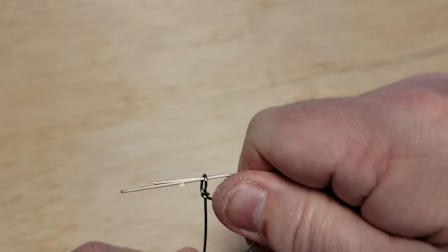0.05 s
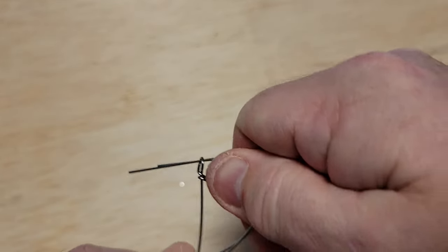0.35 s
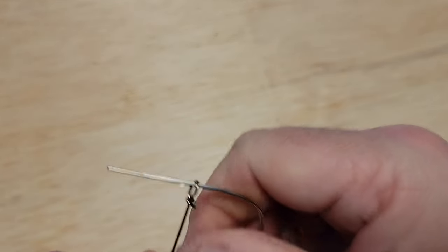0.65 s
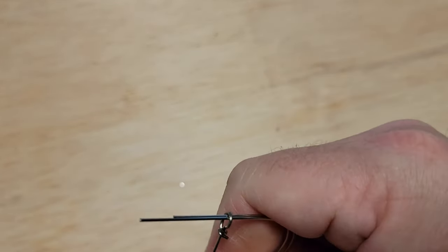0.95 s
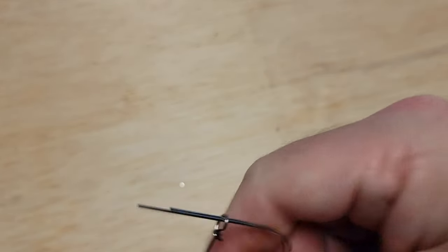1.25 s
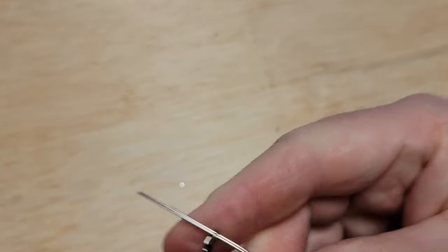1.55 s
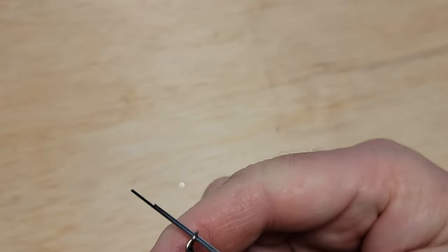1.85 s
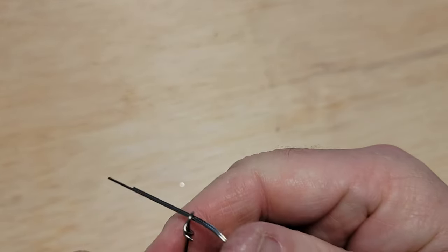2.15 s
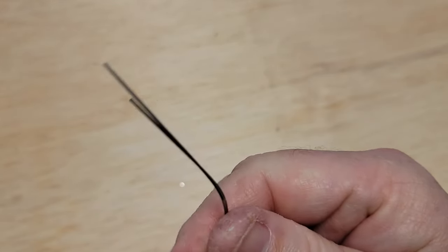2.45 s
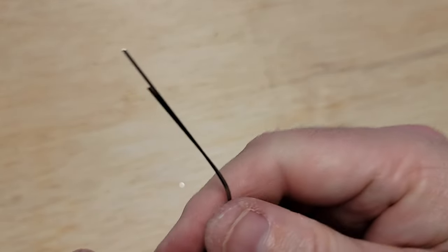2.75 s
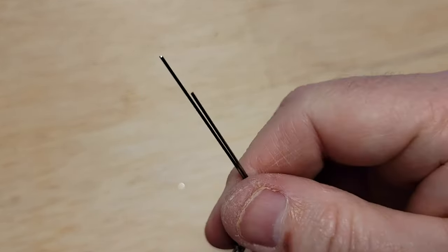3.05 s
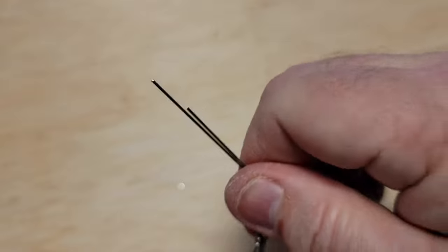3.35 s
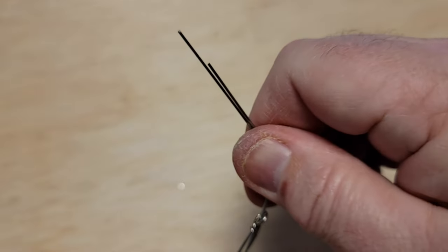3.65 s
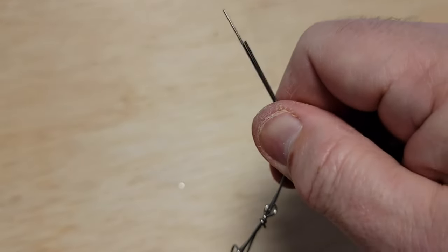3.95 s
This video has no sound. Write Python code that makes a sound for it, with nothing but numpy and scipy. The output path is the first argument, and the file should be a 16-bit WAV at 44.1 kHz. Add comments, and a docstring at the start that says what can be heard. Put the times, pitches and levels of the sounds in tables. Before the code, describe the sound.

One sharp snap of thin wire follows light ticks and the soft hiss of fingertips sliding along it, close up in a small room. The fan hum behind dips after the snap, and a small knock comes last.

```python
"""A faint metallic ring fades over the hum of a fan in a small room.
Close to the microphone, fingers bend thin wire: it ticks, knocks and rubs against skin,
then gives with one sharp snap that the walls throw back.
The recorder's gain control ducks the room after the snap and slowly lets it return."""
import sys
import numpy as np
from scipy import signal
from scipy.fft import rfft, irfft
from scipy.io import wavfile
from scipy.ndimage import uniform_filter1d, minimum_filter1d

SR = 44100
rng = np.random.default_rng(int(sys.argv[2]) if len(sys.argv) > 2 else 0)


def persist_wave(psi):
    """Save psi, clipped to +-1, as 16-bit WAV."""
    counts = np.round(np.clip(psi, -1, 1) * 32767).astype(np.int16)
    wavfile.write(sys.argv[1], SR, np.atleast_2d(counts).T)


N = 4 * SR


def amp(db):
    """Decibels to gain."""
    return 10 ** (np.asarray(db) / 20)


def unit(x):
    """Scales to rms 1."""
    return x / np.sqrt(np.mean(x ** 2) + 1e-20)


def read(points, hz):
    """Reads a table on a log-frequency axis."""
    f, value = np.transpose(points)
    return np.interp(np.log(hz + 1), np.log(f + 1), value)


def add(mix, start_s, sound):
    """Adds a sound at its time."""
    part = mix[max(round(start_s * SR), 0):][:len(sound)]
    part += sound[:len(part)]


def fade(t, t60):
    """Exponential decay, 60 dB down at t60."""
    return np.exp(-np.log(1000) * t / t60)


def noise(colour, size):
    """Noise of rms 1, shaped by a gain per frequency."""
    white = rfft(rng.standard_normal(size))
    return unit(irfft(white * colour(np.fft.rfftfreq(size, 1 / SR)), size))


def burst(colour, t60, size=2048):
    """A dying burst of noise, coloured by a minimum-phase filter so its attack stays sharp."""
    t = np.arange(size) / SR
    envelope = fade(t, t60)
    flat_spectrum = np.exp(1j * np.angle(np.fft.fft(rng.standard_normal(size) * envelope)))
    hz = abs(np.fft.fftfreq(size, 1 / SR))
    log_gain = np.log(np.maximum(unit(colour(hz)), 1e-4))
    response = np.exp(np.conj(signal.hilbert(log_gain)))
    taper = np.cos(np.pi / 2 * t / t[-1]) ** 2
    sound = np.fft.ifft(flat_spectrum * response).real * taper
    return sound * np.linalg.norm(envelope) / np.linalg.norm(sound)


# bands of the opening ring: f/Hz, width/Hz, level/dB, t60/s
RING_BANDS = [(303, 55, -38, 2.1), (830, 440, -39, 1.85), (1095, 46, -39.5, 0.67), (1610, 98, -43.5, 0.69),
              (2280, 690, -51.5, 1), (4550, 1400, -52, 2.7), (6700, 680, -53, 2.1), (9900, 4200, -49, 2.9),
              (14600, 900, -57, 1.5)]
def faint_ring():
    """A fuzzy metallic ring hangs in the room as bands of noise dying away."""
    out, t = np.zeros(N), np.arange(N) / SR
    for hz, width, db, t60 in RING_BANDS:
        band = noise(lambda f: 1 / (1 + ((f - hz) / width * 2) ** 2), N)
        out += amp(db) * fade(t, t60) * band
    return out


# room tone, fan and air: f/Hz, relative level/dB
AIR_COLOUR = [(15, -42), (36, -13), (55, -21), (85, -7), (115, -11.5), (140, -13), (165, -11.5), (205, 2.5),
              (265, -8), (310, -4.5), (345, -10.5), (450, -5), (495, -12.5), (535, -10), (600, -16.5),
              (850, -16.5), (1300, -26.5), (2000, -32), (3200, -35), (6000, -36.5), (9700, -37),
              (12500, -40), (16000, -43)]
# hum of fan and mains: f/Hz, rms level/dB
HUM_LINES = [(59.6, -48), (104.5, -35.5), (120, -45), (183, -44.5), (240, -44.5), (416, -45)]
def fan(air_db=-33.5, drift_rad=0.37, drift_hz=1.6):
    """The fan moves air steadily through the room; its hum lines drift slightly in phase."""
    t = np.arange(N) / SR
    out = amp(air_db) * noise(lambda f: amp(read(AIR_COLOUR, f)), N)
    for hz, db in HUM_LINES:
        drift = drift_rad * noise(lambda f: 1 / (1 + (f / drift_hz) ** 2), N)
        out += amp(db) * np.sqrt(2) * np.sin(2 * np.pi * (hz * t + rng.random()) + drift)
    return out


# wire on wire, close up: t/s, centre f/Hz, half-width/octaves, level/dB
WIRE_TICKS = [(.0330, 2150, 0.18, -29), (.0600, 10000, 0.62, -25), (.0602, 1940, 0.4, -28),
              (.0722, 4460, .15, -27), (.5533, 8500, .3, -34.5), (.5645, 8100, 0.36, -21.5),
              (0.5641, 2600, 0.99, -30.5), (1.248, 2960, 1.4, -33.5), (1.458, 12000, .6, -37),
              (1.715, 13000, .2, -37), (2.4250, 8000, .5, -36), (2.4279, 9200, 0.23, -27),
              (2.551, 8240, .5, -32), (3.042, 10900, 0.56, -31), (3.439, 4370, .3, -36),
              (3.937, 1500, 1.8, -26)]
def ticks(t60=0.011):
    """Tiny slips of wire on wire, damped at once by the fingers."""
    out = np.zeros(N)
    for start_s, hz, octaves, db in WIRE_TICKS:
        colour = lambda f: 1 / (1 + (np.log2((f + 1) / hz) / octaves) ** 2)
        add(out, start_s, amp(db) * burst(colour, t60))
    return out


# dull knocks at the microphone: t/s, f/Hz, level/dB, t60/s
DULL_KNOCKS = [(0.0331, 1320, -11.5, 0.0055), (2.4246, 800, -3, 0.0026), (2.4273, 1040, -9.5, 0.01),
               (2.4332, 360, -28, 0.067), (2.4400, 149, -9.5, 0.065), (3.9369, 716, 0.5, 0.0041)]
def knocks():
    """Soft pushes of wire and fingers that swing for a few cycles."""
    out, t = np.zeros(N), np.arange(SR // 4) / SR
    for start_s, hz, db, t60 in DULL_KNOCKS:
        attack = 1 - np.exp(-4 * hz * t)
        add(out, start_s, amp(db) * attack * fade(t, t60) * np.sin(2 * np.pi * hz * t))
    return out


# decay of the small room: f/Hz, t60/s
ROOM_DECAY = [(100, 0.41), (1000, 0.14), (3000, 0.23), (8000, 0.19), (16000, 0.16)]
def room(x, onset_s=0.013):
    """The room answers with a short, evenly coloured diffuse tail."""
    size = SR // 2
    hz, t, spectra = signal.stft(rng.standard_normal(size), SR, nperseg=256)
    tail = signal.istft(spectra * fade(t, read(ROOM_DECAY, hz)[:, None]), SR)[1][:size]
    build_up = np.minimum(np.arange(size) / SR / onset_s, 1) ** 2
    spectrum = rfft(tail * build_up)
    smooth_gain = np.sqrt(uniform_filter1d(abs(spectrum) ** 2, size=120) + 1e-9)
    even_tail = irfft(spectrum / smooth_gain, size)[:size * 3 // 4]
    return signal.fftconvolve(x, even_tail / np.linalg.norm(even_tail))[:N]


def stroke(colour, length_s, grain_db):
    """Grainy friction noise that swells for length_s and fades for as long."""
    size = int(2 * length_s * SR)
    grains = amp(grain_db * unit(uniform_filter1d(rng.standard_normal(size), size=40)))
    return np.hanning(size) ** 2 * unit(noise(colour, size) * grains)


# skin on wire, close up: peak t/s, swell/s, level/dB, tilt above 5 kHz/(dB per octave)
SKIN_RUBS = [(0.829, .07, -41, -5), (0.92, 0.043, -41, -3), (1.018, .16, -52.5, -7),
             (1.302, 0.044, -42.5, -7.5), (1.348, 0.042, -38, -0.5), (1.455, 0.057, -47.5, -6),
             (1.64, 0.23, -51, -13), (2.273, 0.047, -50, -7), (2.583, 0.069, -45, -7), (3.48, .06, -50, 0)]
# hiss of skin: f/Hz, relative level/dB
SKIN_COLOUR = [(1000, -10), (4000, -14), (6000, -9.5), (6900, -1.5), (8900, 1.5), (10600, -3.5), (12000, 0),
               (14200, 2.5), (16000, -4)]
def rubs():
    """Fingertips hiss as they slide along the wire."""
    out = np.zeros(N)
    for peak_s, swell_s, db, tilt_db in SKIN_RUBS:
        colour = lambda f: amp(read(SKIN_COLOUR, f) + tilt_db * np.log2(np.maximum(f, 5000) / 5000))
        add(out, peak_s - swell_s, amp(db) * stroke(colour, swell_s, grain_db=3.0))
    return out


# hands near the microphone: peak t/s, swell/s, level/dB
HAND_BRUSHES = [(1.679, .4, -41), (2.956, .3, -52), (3.932, 0.13, -32)]
# their muffled rustle: f/Hz, relative level/dB
HAND_COLOUR = [(30, -11), (90, 16), (400, 0), (900, -6), (1500, -11.5), (2500, -22), (5000, -42),
               (16000, -23)]
def brushes():
    """The hands brush against each other."""
    out = np.zeros(N)
    colour = lambda f: amp(read(HAND_COLOUR, f))
    for peak_s, swell_s, db in HAND_BRUSHES:
        add(out, peak_s - swell_s, amp(db) * stroke(colour, swell_s, grain_db=2.2))
    return out


# one crack, close up: f/Hz, relative level/dB
SNAP_COLOUR = [(60, -18), (300, 3.5), (430, 13.5), (600, -1.5), (1250, 5), (1900, 0.5), (3000, -4.5),
               (6000, -5.5), (8400, 1), (10700, -4.5), (11500, 4.5), (12800, -4.5), (16000, -9)]
def crack(start_s, db, t60=0.0069):
    """The wire gives way in a bright, very short burst."""
    out = np.zeros(N)
    add(out, start_s, amp(db) * burst(lambda f: amp(read(SNAP_COLOUR, f)), t60))
    return out


# the snap's quick cluster of short bursts: t/s, level/dB
SNAP_BURSTS = [(2.4324, -3.5), (2.4334, 1.5), (2.4357, -5.5), (2.436, -6)]
def snap():
    """The bursts reach the microphone direct, then off the walls; in the tail they merge into one."""
    direct = sum(crack(start_s, db) for start_s, db in SNAP_BURSTS)
    loudest_s = SNAP_BURSTS[1][0]
    tail = room(crack(loudest_s, db=1))
    return direct + snap_tones(loudest_s) + reflections(direct) + tail


# tones in the snap's tail: f/Hz, level/dB, t60/s
SNAP_TAIL_TONES = [(809, -28.5, 0.18), (1050, -17.5, 0.12), (1087, -22.5, .13), (1201, -19.5, 0.15),
                   (1324, -30, .12), (1575, -24, 0.11), (2060, -30, 0.23), (4780, -31, 0.25),
                   (5230, -22, 0.093), (5700, -31, .12), (8300, -30, .13), (8200, -26, .14),
                   (11382, -34, .14), (11503, -34, .14)]
def snap_tones(start_s):
    """Brief tones that colour the snap's tail."""
    out, t = np.zeros(N), np.arange(SR // 2) / SR
    for hz, db, t60 in SNAP_TAIL_TONES:
        add(out, start_s, amp(db) * fade(t, t60) * np.sin(2 * np.pi * (hz * t + rng.random())))
    return out


# first reflections at the microphone: delay t/s, level/dB
WALL_ECHOES = [(.0085, -7), (.0100, -18), (.0108, -6), (0.0138, -13), (.0240, -9)]
def reflections(x):
    """The nearest walls each return a copy."""
    out = np.zeros(N)
    for delay_s, db in WALL_ECHOES:
        add(out, delay_s, amp(db) * x)
    return out


def scene(handling_wet_db=-13):
    """One microphone close to the hands, with the small room and its fan behind."""
    background = faint_ring() + fan()
    handling = ticks() + knocks() + rubs() + brushes()
    return (background + handling + amp(handling_wet_db) * room(handling) + snap())[None]


def record(dry):
    """The recorder's gain drops at once, holds and recovers; peaks clip and the top treble is cut."""
    threshold_db, cut_share, hold_s, recover_db_per_s = -19, 0.44, 1, 6.5
    clip_level, cutoff_hz = 0.85, 15850
    level_db = 10 * np.log10(abs(uniform_filter1d(dry[0] ** 2, size=400)) + 1e-12)
    cut_db = cut_share * np.maximum(level_db - threshold_db, 0)
    half_hold = int(hold_s * SR) // 2
    held_db = -minimum_filter1d(-cut_db, 2 * half_hold + 1, origin=half_hold, mode="constant")
    recovery_db = recover_db_per_s * np.arange(N) / SR
    gain_db = recovery_db - np.maximum.accumulate(held_db + recovery_db)
    clipped = np.clip(dry * amp(gain_db), -clip_level, clip_level)
    lowpass = signal.firwin(511, cutoff_hz, window=("kaiser", 9), fs=SR)
    return signal.oaconvolve(clipped, lowpass[None], "same")


dry = scene()
out = record(dry)
persist_wave(out)
```